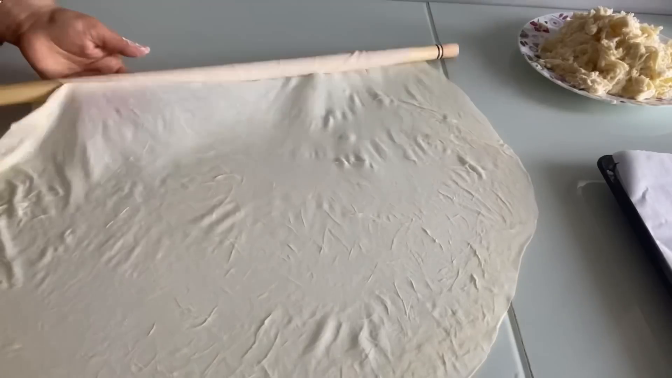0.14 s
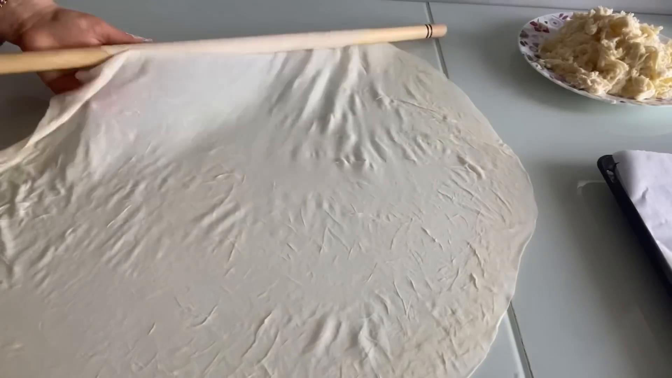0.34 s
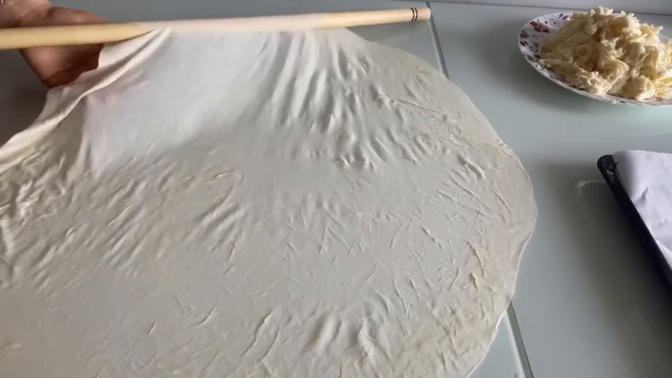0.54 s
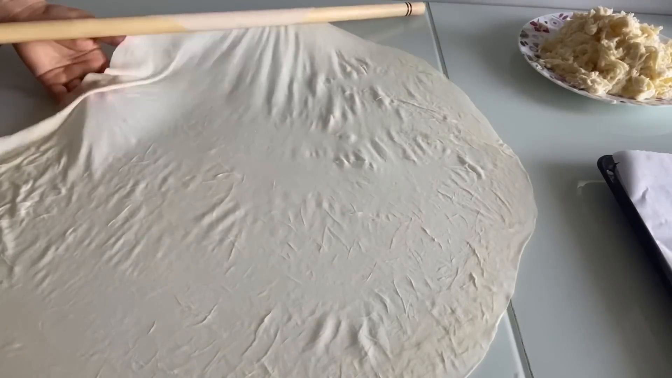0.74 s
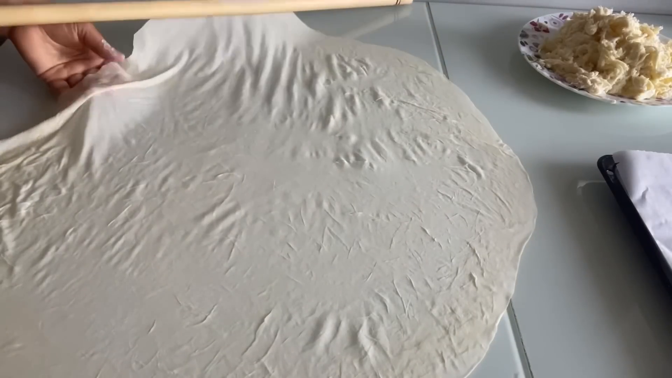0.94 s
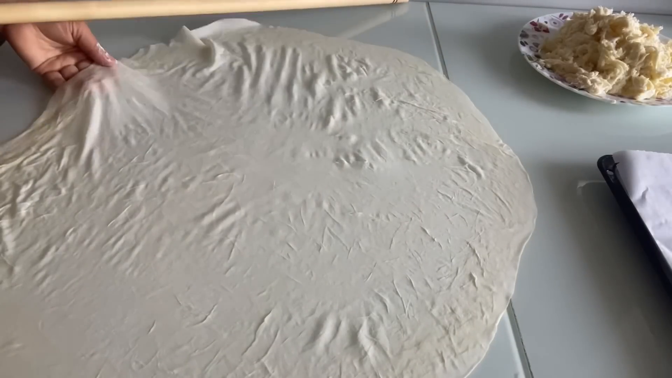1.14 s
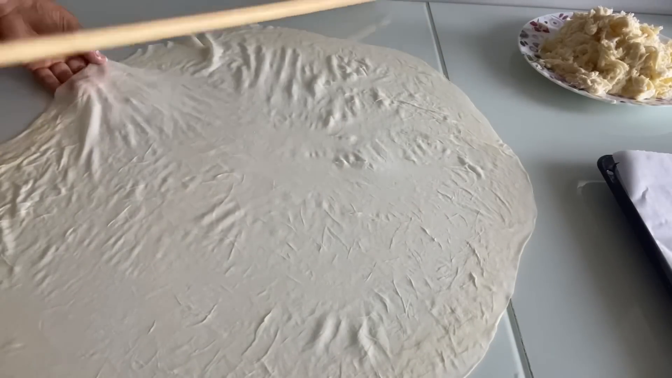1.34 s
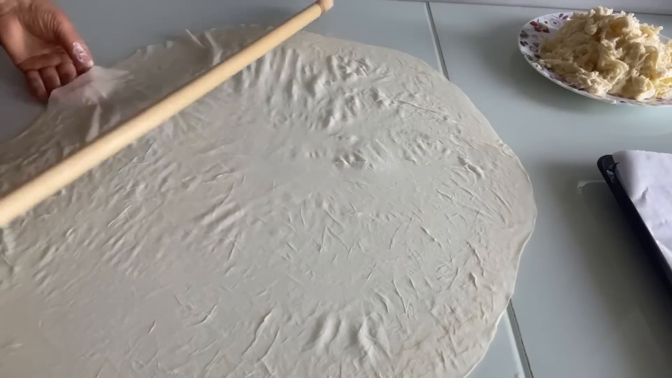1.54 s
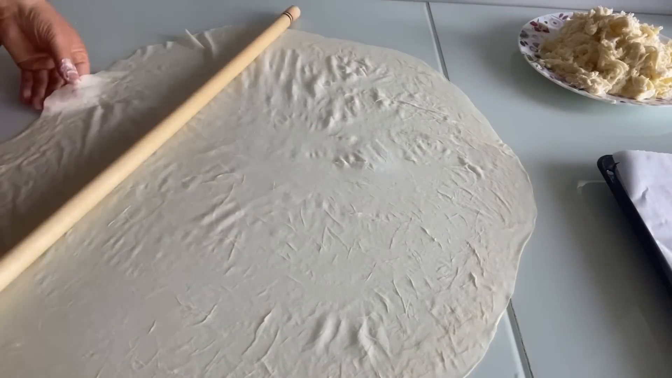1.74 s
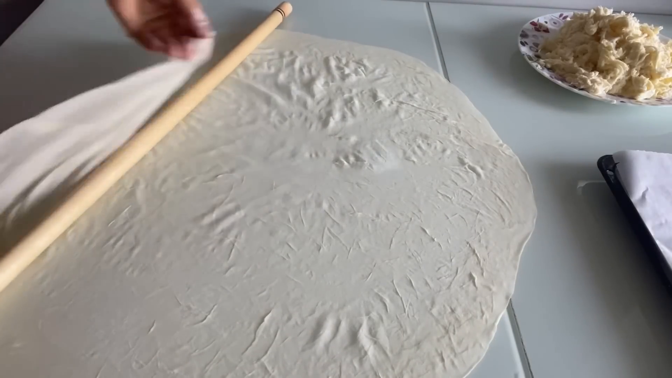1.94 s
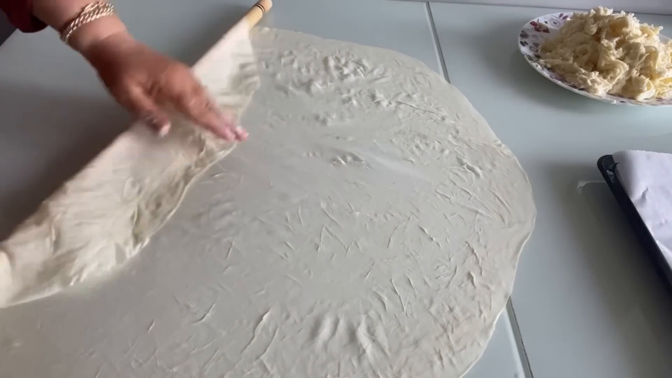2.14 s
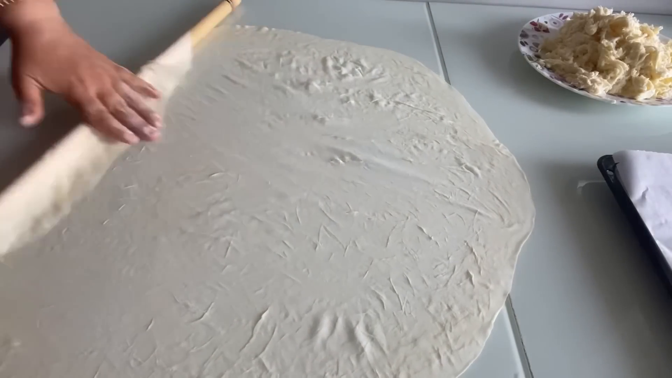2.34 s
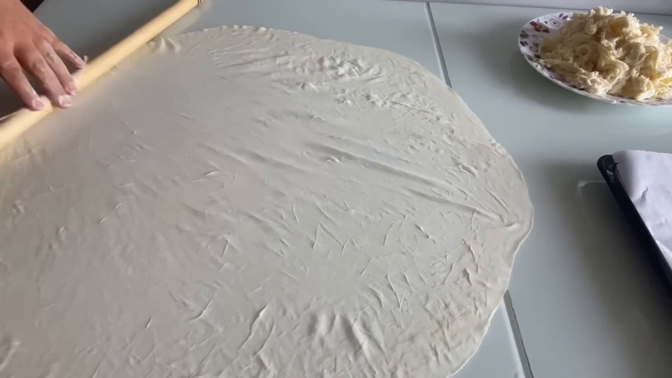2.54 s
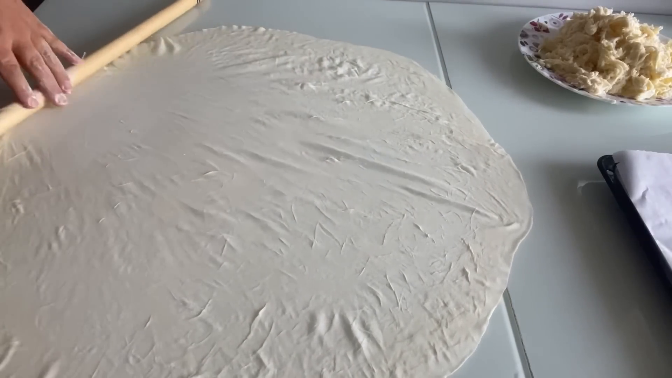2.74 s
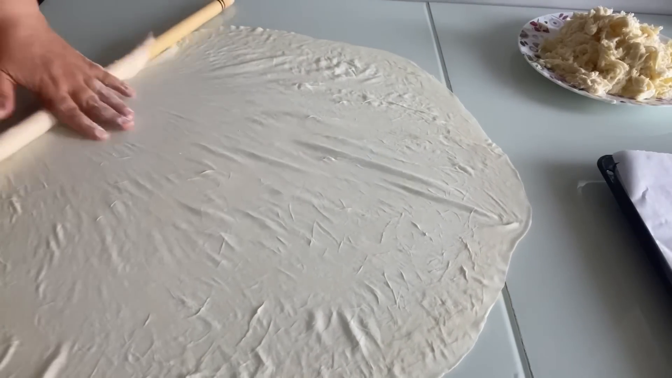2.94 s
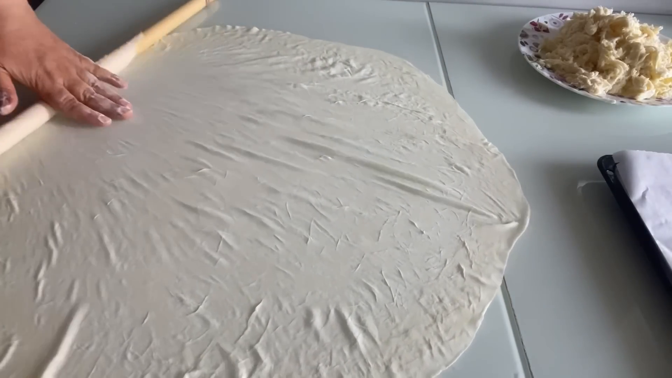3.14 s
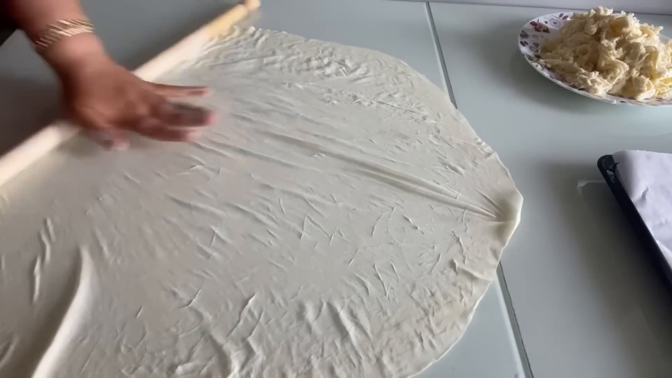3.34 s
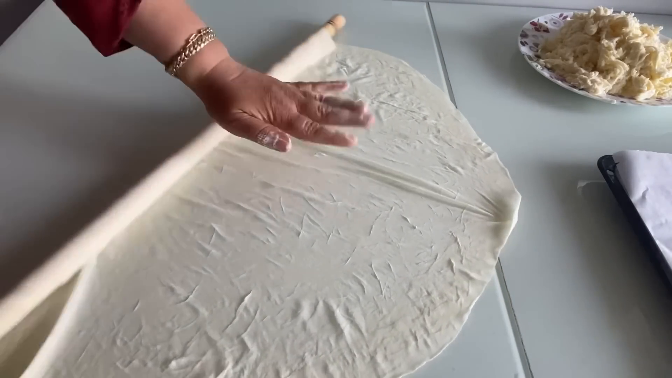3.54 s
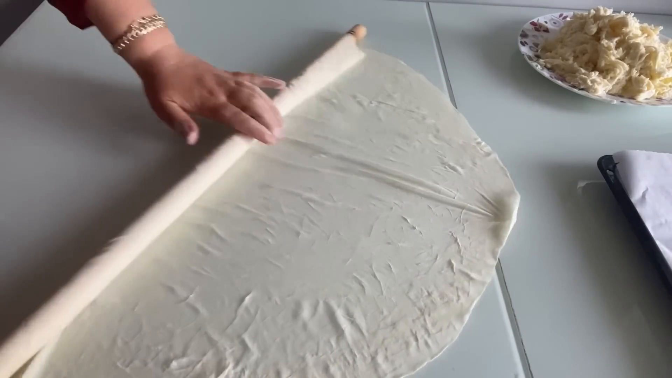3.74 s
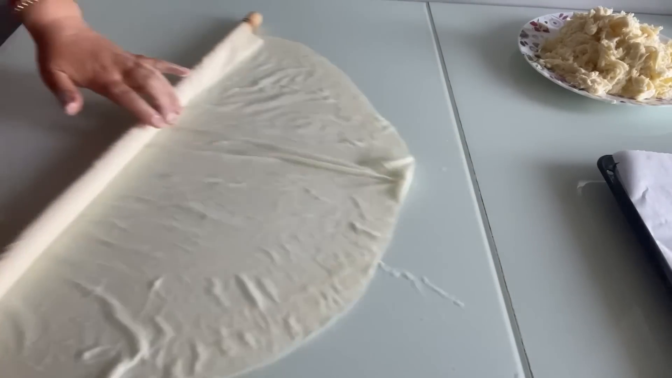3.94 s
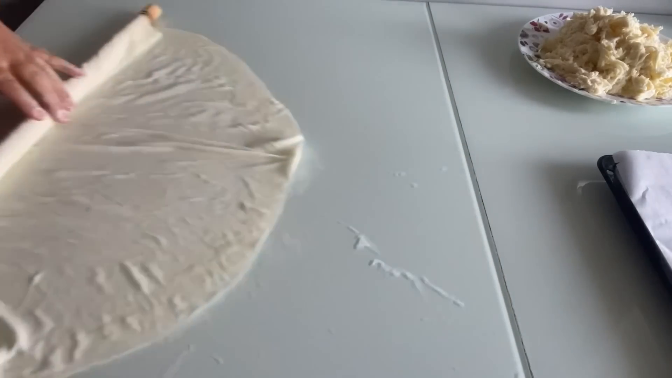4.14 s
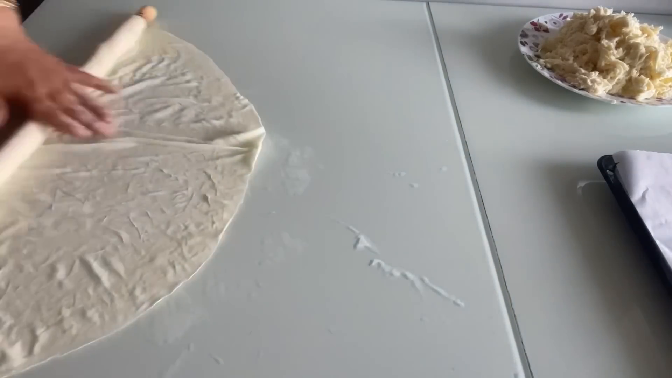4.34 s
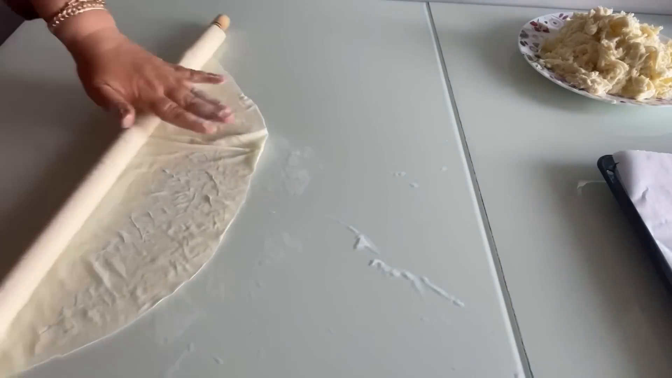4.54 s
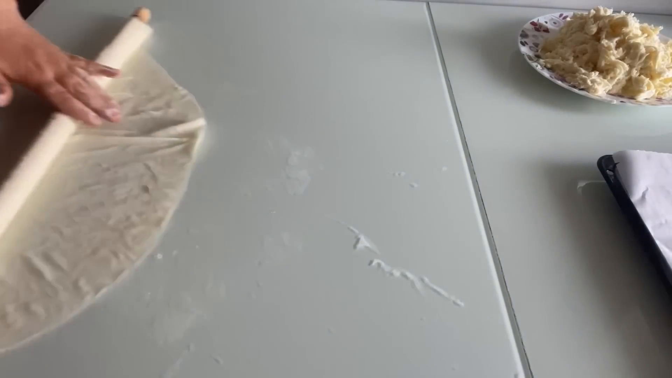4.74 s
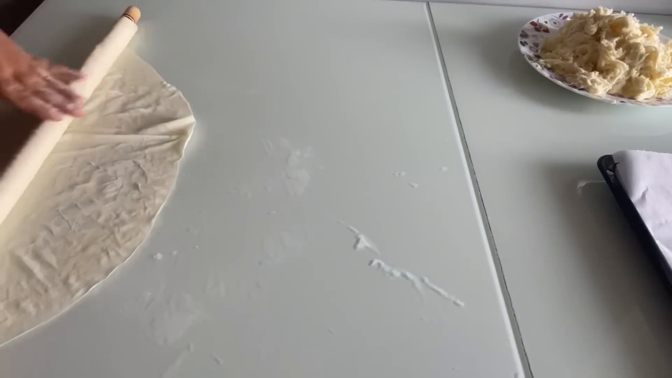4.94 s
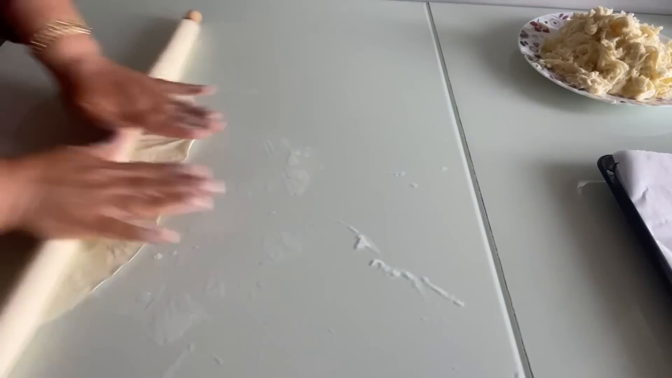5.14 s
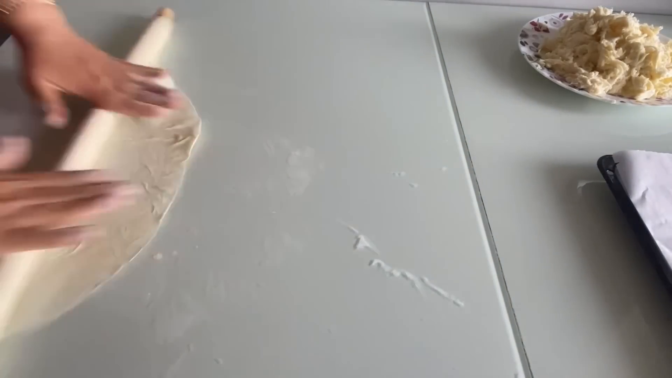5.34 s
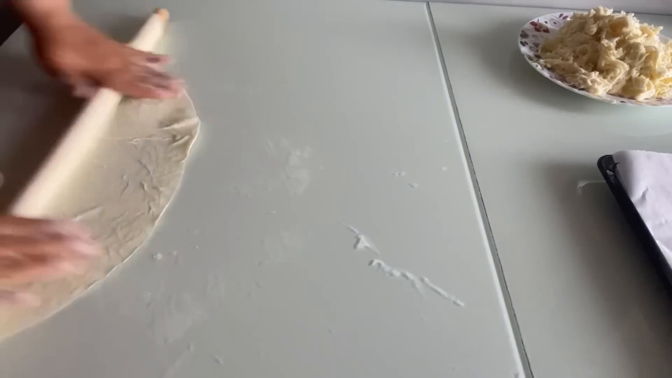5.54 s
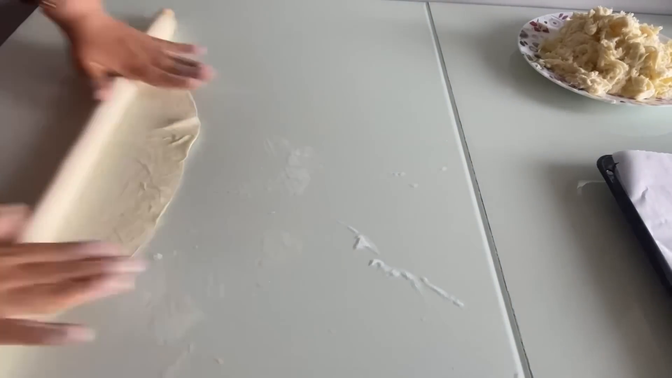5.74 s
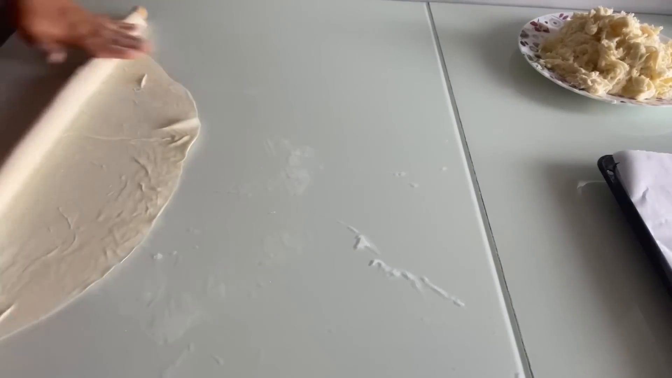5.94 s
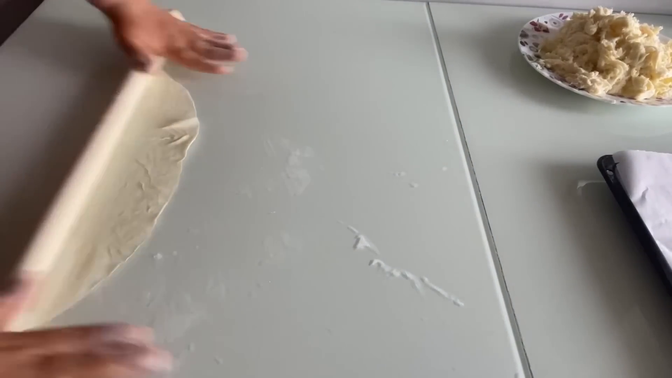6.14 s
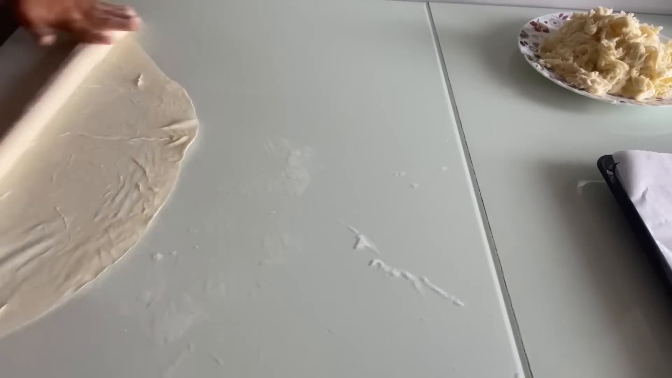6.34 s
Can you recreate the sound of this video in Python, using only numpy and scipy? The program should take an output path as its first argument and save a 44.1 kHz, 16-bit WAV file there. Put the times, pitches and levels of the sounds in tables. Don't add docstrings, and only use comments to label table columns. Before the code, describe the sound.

A quiet, small, hard-surfaced kitchen, picked up close in stereo with little deep bass. From 0 to 1.5 seconds a loose dough sheet flutters softly and palms hiss faintly over floury glass, with a light wooden tap at 0.4, a firmer one near 1.0 and a barely audible distant whine around 0.6 to 0.85. At 1.6 the bare thin pin clacks on the glass, bright and woody, with an immediate bounce. Soft pats, dough slaps and a sharp tick follow around 1.7 to 2.5, with brushing slides. Gentler strokes lead to the loudest event at 3.35: the wrapped pin drops flat, a dry double smack with a short low boom. A strong floury swish runs from 3.6 to 4.2, then shorter strokes and a lull. From 5.0 to the end, quick rolls alternate about every fifth of a second, rumbling low with thuds, palm squeaks, scuffs and hiss.

```python
import sys
import numpy as np
from scipy import signal
from scipy.fft import rfft, irfft, next_fast_len
from scipy.io import wavfile
from scipy.ndimage import uniform_filter1d, map_coordinates

SR = 44100
rng = np.random.default_rng(int(sys.argv[2]) if len(sys.argv) > 2 else 0)


def makeup_ratio(level_db):
    decades = np.asarray(level_db, float) / 20
    return 10 ** decades


def bounce(signal):
    frames = np.transpose(np.atleast_2d(signal))
    limited = np.clip(frames, -1, 1)
    pcm = np.round(limited * 32767).astype(np.int16)
    wavfile.write(sys.argv[1], SR, pcm)


N = 286650


def unit(x):
    return x / np.sqrt(np.mean(x ** 2) + 1e-20)


def along(points, hz):
    f, v = np.transpose(points)
    return np.interp(np.log(hz + 1), np.log(f + 1), v)


def colour(table):
    return lambda hz: makeup_ratio(along(table, hz))


def curves(rows):
    s, *cols = np.transpose(rows)
    return [np.interp(np.arange(N) / SR, s, c) for c in cols]


def wobble(rate_hz):
    knots = rng.standard_normal(int(N * rate_hz / SR) + 4)
    return map_coordinates(knots, [np.arange(N) * rate_hz / SR])


def filtered(x, response):
    n = x.shape[-1]
    m = next_fast_len(n + SR // 2)
    return irfft(rfft(x, m) * response(np.fft.rfftfreq(m, 1 / SR)), m)[..., :n]


def modes(table, spread_db=0):
    gains = makeup_ratio(spread_db * rng.standard_normal(len(table)))

    def response(f):
        total = 0
        for k, ((centre, width, db), gain) in enumerate(zip(table, gains)):
            resonance = 1j * f * width / (centre * centre - f * f + 1j * f * width)
            total = total + (-1) ** k * gain * makeup_ratio(db) * resonance
        return total
    return response


def blow(corner_hz, response, order=2):
    impulse = np.eye(1, SR // 2)[0]
    ring = filtered(impulse, lambda f: response(f) / (1 + 1j * f / corner_hz) ** order)
    return ring / np.abs(ring).max()


def burst(t60_s, gain):
    t = np.arange(-200, SR // 10) / SR
    noise = rng.standard_normal(len(t)) * makeup_ratio(-60 * t / t60_s) * (t >= 0)
    puff = filtered(noise, gain)[188:]
    puff = puff * np.sin(np.pi / 2 * np.minimum(np.arange(len(puff)) / 24, 1)) ** 2
    return puff / np.abs(puff).max()


# frequency in Hz, likeness 0 to 1.
ALIKE = [(60, 1), (130, 0.73), (300, 0.49), (600, 0.08), (1500, 0.21), (4000, 0.07), (5500, 0.33),
         (7000, 0.42), (9200, 0.96), (15000, 0.95)]


def paired(pair, gain):
    turn = lambda hz: np.arccos(np.clip(along(ALIKE, hz), -1, 1)) / 2
    mid, side = filtered(pair, lambda hz: gain(hz) * [np.cos(turn(hz)), np.sin(turn(hz))])
    return np.array([mid + side, mid - side])


def rush(gain, patchy_db, grain_db, grain_rate_hz):
    grains = rng.standard_normal((2, N)) * makeup_ratio(grain_db * wobble(grain_rate_hz))
    z = signal.stft(grains, nperseg=512)[2]
    field = uniform_filter1d(rng.standard_normal(z.shape[1:]), 6, 0)
    field = uniform_filter1d(field, 10, 1)
    pair = signal.istft(z * makeup_ratio(patchy_db * unit(field)), nperseg=512)[1][:, :N]
    return unit(paired(pair, gain))


# frequency in Hz, t60 in seconds.
KITCHEN_T60 = [(80, 0.56), (300, 0.63), (1200, 0.47), (3000, 0.37), (6000, 0.28), (10000, 0.098)]


def room(x):
    hz, t, z = signal.stft(rng.standard_normal((2, SR)), SR, nperseg=256)
    fade = makeup_ratio(-60 * t / along(KITCHEN_T60, hz)[:, None])
    tail = signal.istft(z * fade, SR, nperseg=256)[1][:, :SR]
    tail = paired(tail, np.ones_like)
    delayed = np.pad(x, (120, 0))[None]
    return signal.fftconvolve(delayed, tail / np.linalg.norm(tail[0]), axes=1)[:, :SR]


def add(track, s, sound):
    start = round(s * SR)
    track[..., start:start + sound.shape[-1]] += sound


def place(track, s, dry, room_db, far=None):
    add(track, s, dry[None])
    add(track, s, makeup_ratio(room_db) * room(dry if far is None else far))


def strokes(rows, levels_db, rise_s, fall_s, bend):
    s = np.arange(N) / SR
    power = 0
    for (start, length, *_), db in zip(rows, levels_db):
        speeding = np.clip((s - start) / rise_s, 0, 1)
        slowing = np.clip((start + length - s) / fall_s, 0, 1)
        power = power + (makeup_ratio(db) * (speeding * slowing) ** bend) ** 2
    keep = makeup_ratio(-120 / (0.4 * SR))
    return np.sqrt(power + makeup_ratio(-15.5) * signal.lfilter([1 - keep], [1, -keep], power))


# start in seconds, level in dB, t60 in seconds.
FLAPS = [(.05, -53.5, 0.41), (.26, -51.5, 0.32), (.42, -51.5, 0.5), (.98, -46, 0.54), (1.69, -39, 0.59),
         (1.93, -44.5, 0.36), (2.23, -45.5, 0.35), (2.48, -56, .5), (2.86, -55.5, 0.45), (3.44, -36, 0.56),
         (4.58, -58, 0.62)]


def settling():
    rise_s = 0.027
    total = 0
    for start, db, t60_s in FLAPS:
        t = np.maximum(np.arange(N) / SR - start, 0)
        total = total + makeup_ratio(db - 60 * t / t60_s) * np.minimum(t / rise_s, 1)
    return total


def steady(x, span_s):
    power = uniform_filter1d(np.mean(x ** 2, axis=0), int(span_s * SR))
    return x / np.sqrt(np.abs(power) + 0.059)


# time in seconds, level in dB.
BUSTLE = [(0, -53), (.2, -59), (.55, -57), (.9, -58.5), (1.3, -61.5), (1.55, -61.5), (2.09, -61),
          (2.17, -72), (2.25, -59.5), (2.75, -64), (3.0, -73), (3.25, -65), (3.7, -62), (4.02, -71.5),
          (4.16, -81.5), (4.3, -67), (4.98, -69), (5.06, -58)]


def busy():
    bustle_db, = curves(BUSTLE)
    return bustle_db, bustle_db + 60


# start in seconds, length in seconds, speed in dB, palm pressure in dB.
SLIDES = [(-.05, 0.24, -72.5, 0.5), (0.13, 0.34, -75, 3), (0.386, 0.39, -79.5, 10.5),
          (0.682, 0.21, -78, 14.5), (0.845, 0.27, -78, 8.5), (1.114, 0.25, -73.5, 3.5),
          (1.295, 0.51, -71.5, 4), (1.8, 0.36, -70.5, -4), (2.018, 0.596, -69.5, -1.5),
          (2.749, 0.28, -69, -5), (3.004, 0.23, -66.5, 2), (3.19, .44, -67, 4), (3.611, .66, -62, -10),
          (4.244, 0.23, -68.5, 4), (4.427, 0.18, -69, -0.5), (4.509, 0.3, -64, -2), (4.715, .24, -84.5, 16)]
# start in seconds, length in seconds, speed in dB, palm pressure in dB, weight on glass in dB.
ROLLS = [
    (5.003, .25, -67, 10.5, -41.5),
    (5.237, 0.23, -66.5, 10.5, -39.5),
    (5.459, .21, -66.5, 13, -35),
    (5.662, .22, -64, 7, -35.5),
    (5.861, 0.23, -68, 11, -39),
    (6.089, 0.22, -66, 9.5, -41.5),
    (6.291, .23, -67.5, 11, -44),
]
# frequency in Hz, width in Hz, level in dB.
SHAKE = [(51, 29.2, -0.5), (79, 29.8, -3), (120, 21.7, 1.5), (150, 36.5, -7.5)]
# frequency in Hz, width in Hz, level in dB.
COUNTER = [(53.3, 22.4, 3.5), (83.3, 32, -8), (117.4, 8.2, 5), (186, 29, -6.5), (222, 49, -12),
           (269.4, 13, -3.5), (303.4, 57, -11), (390, 30, -5), (423, 89, -11)]
# frequency in Hz, level in dB per Hz.
FLAP = [(88, -33.5), (150, -7.5), (208, -2), (254, -14), (384, -8.5), (522, -11.5), (1090, -15.5),
        (1600, -28), (2080, -61), (3520, -120)]
RUB = [(700, -29), (1100, -6), (1400, -6.5), (1650, -3.5), (1900, -7.5), (2150, -4), (2600, -7),
       (4000, -19), (6000, -29.5)]
HISS = [(800, -47), (1500, -23.5), (2500, -3.5), (3600, -1), (5500, -2), (7800, -0.5), (9500, -3.5),
        (11500, -8), (13200, -6.5), (15500, -10)]


def rolling():
    bustle_db, excess_db = busy()
    slides, rolls = np.array(SLIDES), np.array(ROLLS)
    slide = lambda db: strokes(slides, db, rise_s=0.12, fall_s=0.11, bend=0.84)
    roll = lambda db: strokes(rolls, db, rise_s=0.069, fall_s=0.12, bend=1.07)

    weight = roll(rolls[:, 4])
    shake = np.hypot(makeup_ratio(-51.5 + 0.75 * excess_db + wobble(11)), weight)
    flutter = np.hypot(makeup_ratio(bustle_db), settling())
    palms = slide(slides[:, 2] + slides[:, 3]) + roll(rolls[:, 2] + rolls[:, 3])
    palms = palms + makeup_ratio(-73.5 + 0.3 * excess_db)
    flour = slide(slides[:, 2]) + roll(rolls[:, 2])

    shaking = rush(modes(SHAKE), patchy_db=-0.3, grain_db=-0.5, grain_rate_hz=16)
    rumble = shake * makeup_ratio(-1.5) * steady(shaking, span_s=0.056)
    flap = flutter * rush(colour(FLAP), patchy_db=-1.5, grain_db=2.0, grain_rate_hz=170)
    wound = np.arange(N) / SR > ROLLS[0][0]
    creak = np.hypot(flutter, makeup_ratio(-25.5) * weight)
    creak = creak * rush(modes(COUNTER[4:]), patchy_db=2.5, grain_db=3.5, grain_rate_hz=44)
    flap = np.where(wound, creak, flap)
    rub = palms * rush(colour(RUB), patchy_db=1.5, grain_db=1.5, grain_rate_hz=150)
    hiss = flour * makeup_ratio(11.5) * rush(colour(HISS), patchy_db=1.8, grain_db=1.0, grain_rate_hz=210)
    return rumble + flap + rub + hiss


# centre in seconds, length in seconds, level in dB.
SCUFFS = [
    (5.214, 0.052, -53.5),
    (5.41, 0.05, -55),
    (5.535, 0.104, -60),
    (5.737, 0.036, -67),
    (5.86, 0.05, -54.5),
    (6.202, 0.026, -61),
    (1.94, 0.02, -60),
    (2.05, 0.046, -55),
    (2.16, 0.053, -59.5),
]
# centre in seconds, length in seconds, level in dB.
GRIPS = [
    (5.12, .04, -55.5),
    (5.56, .04, -51.5),
    (5.73, .035, -54.5),
    (5.99, .04, -53),
    (6.14, .03, -60),
    (6.39, 0.034, -58.5),
    (3.6, 0.044, -61.5),
    (2.15, .05, -63),
    (5.4, .03, -58),
]
# frequency in Hz, width in Hz, level in dB.
GRIP = [(1600, 200, 2.5), (1954, 370, -2), (2500, 500, -8.5)]


def scuffs():
    s = np.arange(N) / SR
    swell = lambda rows: sum(makeup_ratio(db) * np.exp(-((s - at) / length) ** 2) for at, length, db in rows)
    pin_end = modes([(620, 180, 1.0), (960, 490, -2.0)])
    end = swell(SCUFFS) * rush(pin_end, patchy_db=3.5, grain_db=2.0, grain_rate_hz=90)
    grip = swell(GRIPS) * rush(modes(GRIP), patchy_db=2.0, grain_db=3.0, grain_rate_hz=120)
    return end + grip


# frequency in Hz, level in dB.
SMACK = [(250, -42), (500, -8), (1000, -4.5), (1650, -3), (2200, -7), (3200, 0), (4700, -3.5),
         (6000, -10.5), (8000, -19.5), (9500, -25.5), (10500, -52), (15000, -69.5)]


def smack(db, t60_s, thin_hz=300):
    thinned = lambda hz: colour(SMACK)(hz) * hz ** 2 / (hz ** 2 + thin_hz ** 2)
    puff = makeup_ratio(db) * burst(t60_s, thinned)
    click = filtered(np.eye(1, SR // 10, 100)[0], thinned)
    return puff, click * np.linalg.norm(puff) / np.linalg.norm(click)


# time in seconds, peak in dB, counter thump in dB, room in dB.
KNOCK = [
    (1.6015, -8, -23.5, -3),
    (1.6046, -13.5, -24.5, -6.5),
]
# time in seconds, peak in dB, hardness in Hz,
# weight of low modes in dB per octave, room in dB.
TAPS = [
    (0.4249, -36.5, 2200, 3.5, -2.5),
    (0.9755, -31, 2000, -1, -1.5),
]
# time in seconds, peak in dB, t60 in seconds, room in dB, thin below Hz.
SLAPS = [
    (3.3453, -11, 0.008, -6.5, 1300),
    (3.368, -1, 0.0084, -4, 300),
    (3.3708, 0, .012, -4, 300),
    (3.379, -20, 0.0067, -1, 300),
]
# time in seconds, peak in dB.
BOOM = (3.371, -12.5)
# frequency in Hz, width in Hz, level in dB.
PIN = [(639, 63, -9), (822, 64, -13.5), (1048, 30, -2.5), (1389, 65, -11.5), (1745, 60, -7.5),
       (1983, 45, -7), (2154, 63, -6.5), (2373, 28, 3.5), (2795, 35, 3), (3120, 180, -11.5), (3465, 67, -3),
       (3840, 44, 0.5), (4144, 110, -9), (4570, 100, -12), (5050, 150, -11.5), (6320, 440, -20)]
REST = [(230, 69, -7), (380, 39, 2.5), (584, 22, -4), (701, 92, -7), (842, 35, 1), (928, 73, -4.5),
        (1282, 48, 0.5), (1696, 73, -12), (2170, 49, -7.5), (2770, 110, -15), (3230, 190, -16)]
PANE = [(116, 13, -1), (172, 9.7, -6), (239, 35, -9), (271.2, 7, 1.5), (305.7, 8.6, -8), (405, 72, -17),
        (674, 60, -15.5)]


def knocks():
    out = np.zeros((2, N + 2 * SR))
    for s, db, thump_db, room_db in KNOCK:
        ring = blow(9000, modes(PIN, spread_db=1.7))
        thump = makeup_ratio(thump_db) * blow(800, modes(COUNTER))
        place(out, s, makeup_ratio(db) * (ring + thump), room_db)
    puff, click = smack(KNOCK[0][1] - 9, t60_s=0.02)
    place(out, KNOCK[0][0], puff, room_db=-9.0, far=click)
    for s, db, hard_hz, tilt_db, room_db in TAPS:
        tilted = [(hz, width, level - tilt_db * np.log2(hz / 800)) for hz, width, level in REST]
        place(out, s, makeup_ratio(db) * blow(hard_hz, modes(tilted, spread_db=2.8)), room_db)
    for s, db, t60_s, room_db, thin_hz in SLAPS:
        puff, click = smack(db, t60_s, thin_hz)
        place(out, s, puff, room_db, far=click)
    boom_s, boom_db = BOOM
    place(out, boom_s, makeup_ratio(boom_db) * blow(710, modes(PANE)), room_db=-5.5)
    return out[:, :N]


# time in seconds, peak in dB, brightness in Hz, t60 in seconds.
TICKS = [
    (1.9333, -31.5, 9000, 0.019),
    (1.94, -38, 6100, 0.011),
    (1.9598, -26, 9200, 0.0038),
    (2.0214, -28.5, 4000, 0.022),
    (2.033, -31.5, 7000, 0.042),
    (3.2559, -38.5, 1315, 0.015),
    (5.5455, -41.5, 3000, .01),
    (5.6915, -54.5, 5100, .01),
    (5.9768, -40, 3000, .01),
    (6.119, -39.5, 6000, .01),
]
# time in seconds, peak in dB, firmness in Hz.
PATS = [(.85, -47, 150), (1.691, -30, 410), (1.734, -30.5, 202), (1.936, -39.5, 460), (1.963, -39.5, 250),
        (2.232, -31.5, 320), (2.236, -36, 111), (2.4, -44, 110), (2.489, -38, 408), (2.51, -42, 110),
        (2.847, -41, 120), (2.901, -47.5, 483), (3.279, -40, 150), (3.315, -32, 150), (3.342, -28, 150),
        (4.341, -44, 69), (4.578, -35, 70), (5.035, -29.5, 70), (5.338, -25.5, 61.7), (5.769, -28.5, 63),
        (5.96, -27, 89.7), (6.135, -32, 91), (6.189, -26.5, 61.6), (6.377, -39.5, 79)]


def touches():
    out = np.zeros((2, N + 2 * SR))
    for s, db, bright_hz, t60_s in TICKS:
        crack = burst(t60_s, lambda f: f / (f + 300) / (1 + (f / bright_hz) ** 2))
        place(out, s, makeup_ratio(db) * crack, room_db=-6.5)
    for s, db, firm_hz in PATS:
        lift = lambda f: 1j * f / (firm_hz + 1j * f)
        body = modes(COUNTER + [(firm_hz, firm_hz / 3, -1.5)], spread_db=3.5)
        pat = blow(1.24 * firm_hz, lambda f: body(f) * lift(f), order=3)
        place(out, s, makeup_ratio(db) * pat, room_db=-5.5)
    return out[:, :N]


# start in seconds, length in seconds, pitch in Hz, level in dB.
WHINE = [
    (0.599, .045, 1070, -61.5),
    (.66, .1, 1075, -66),
    (.76, .1, 1080, -64),
]


def whine():
    s = np.arange(N) / SR
    drift = 2 * np.pi * np.cumsum(6 * wobble(9.4)) / SR
    notes = 0
    for start, length, hz, db in WHINE:
        fade = np.clip(np.minimum(s - start, start + length - s) / 0.019, 0, 1)
        notes = notes + makeup_ratio(db) * fade * np.sin(2 * np.pi * hz * s + drift)
    return notes * makeup_ratio(3.5 + 1.8 * wobble(29.5))


# frequency in Hz, level in dB per Hz.
AIR = [(25, -16), (45, 4), (65, -5.5), (120, -16.5), (170, -21.5), (380, -17), (600, -29.5), (1200, -24),
       (2000, -28.5), (4700, -30.5), (9000, -47.5), (15000, -72.5)]


def air():
    _, excess_db = busy()
    noise = rush(colour(AIR), patchy_db=0.0, grain_db=2.5, grain_rate_hz=19)
    return makeup_ratio(-60.0 + 0.25 * excess_db) * noise


def scene():
    return rolling() + scuffs() + knocks() + touches() + whine() + air()


def roll_off(x):
    return signal.sosfilt(signal.butter(12, 14910, fs=SR, output="sos"), x)


# frequency in Hz, left minus right in dB.
LEAN = [(60, -7), (150, -5.5), (600, -4), (1600, -2), (5000, -4), (7200, -2.5), (8500, 1.5), (15000, -1)]
# frequency in Hz, lead of the left port in cycles.
LEAD = [(30, .01), (100, .03), (400, .08), (1500, .15), (3500, .2), (5500, .4), (8000, 1), (10300, 1.5),
        (13000, 2), (15300, 2.5)]


def record(dry):
    ear = np.array([[.5], [-.5]])
    ports = lambda hz: makeup_ratio(ear * along(LEAN, hz)) * np.exp(2j * np.pi * ear * along(LEAD, hz))
    bass_cut = lambda hz: (1j * hz / (36 + 1j * hz)) ** 3
    heard = filtered(dry, lambda hz: ports(hz) * bass_cut(hz))
    left, right = heard / (1 + np.abs(heard / 1.1) ** 4) ** .25
    outside = lambda hz, low_hz, high_hz: (hz < low_hz) | (hz > high_hz)
    mid_band = lambda hz: (hz < 14700) & outside(hz, 9700, 11000)
    side_band = lambda hz: (hz < 15800) & outside(hz, 7400, 8800) & outside(hz, 12300, 13800)
    mid = filtered((left + right) / 2, mid_band)
    side = filtered((left - right) / 2, side_band)
    return roll_off(np.array([mid + side, mid - side]))


dry = scene()
out = record(dry)
bounce(out)
```